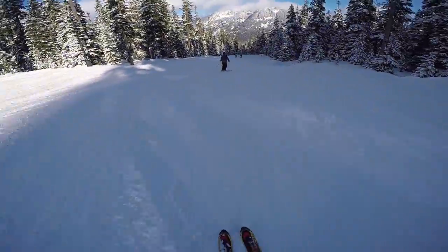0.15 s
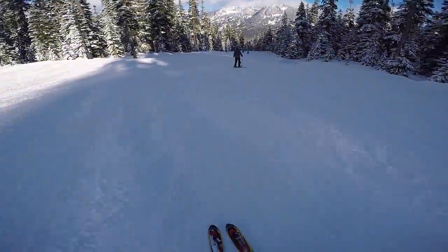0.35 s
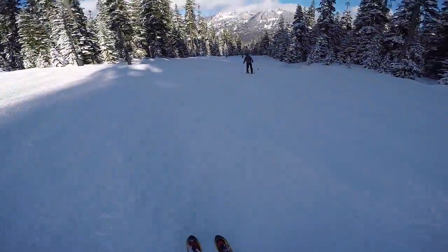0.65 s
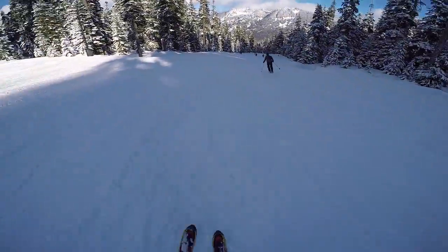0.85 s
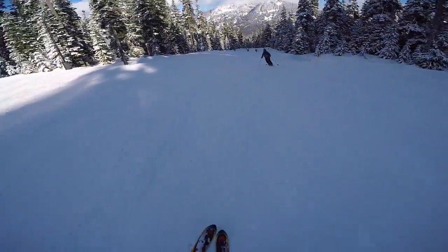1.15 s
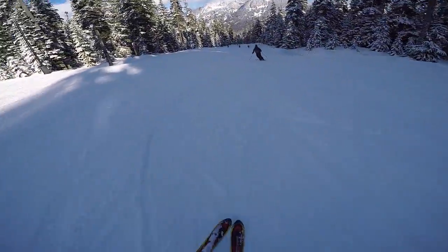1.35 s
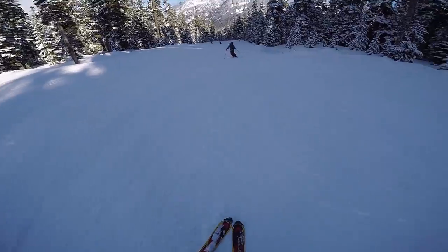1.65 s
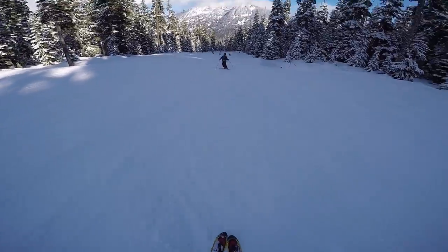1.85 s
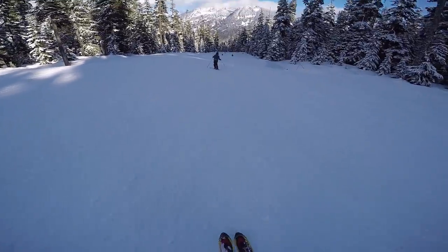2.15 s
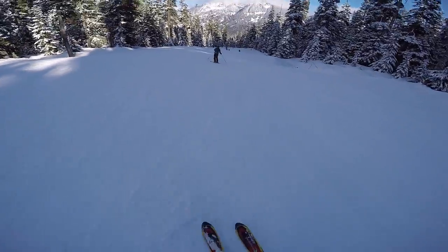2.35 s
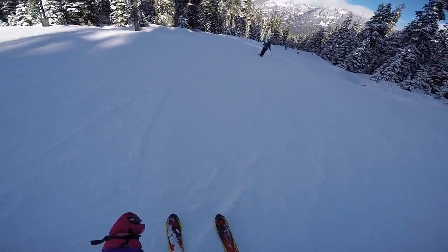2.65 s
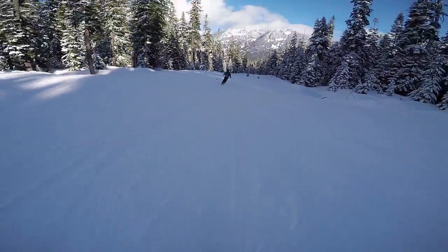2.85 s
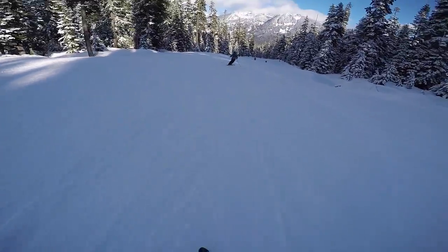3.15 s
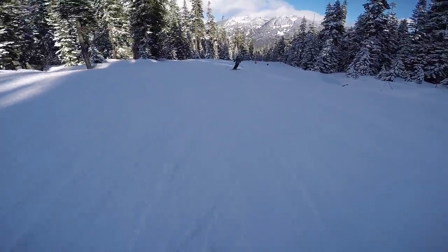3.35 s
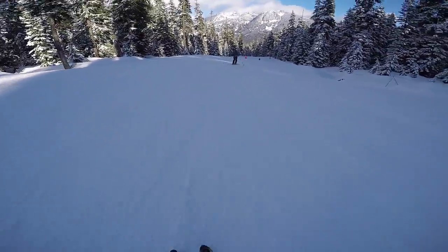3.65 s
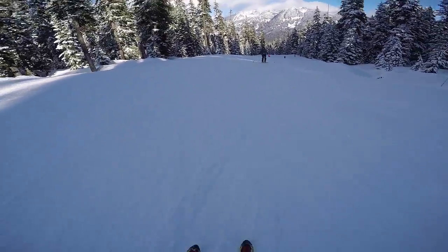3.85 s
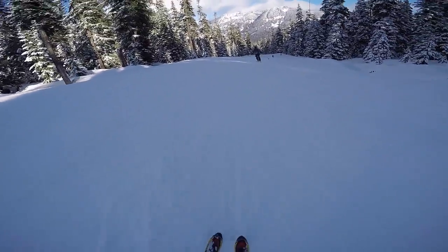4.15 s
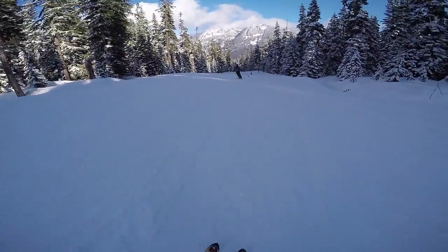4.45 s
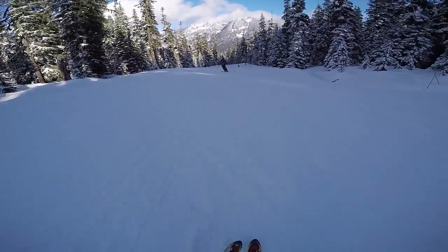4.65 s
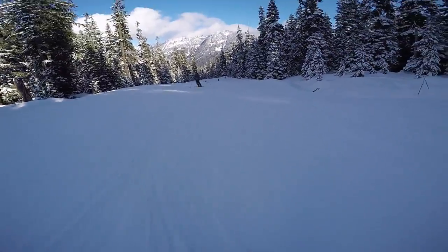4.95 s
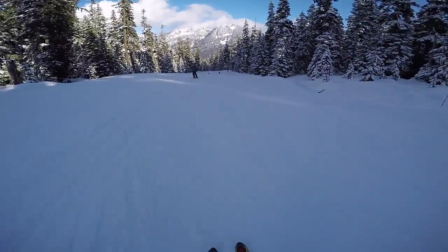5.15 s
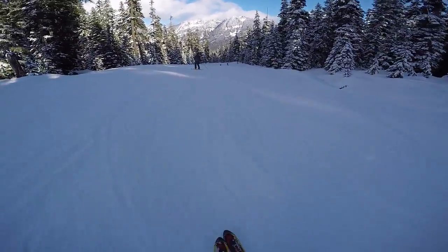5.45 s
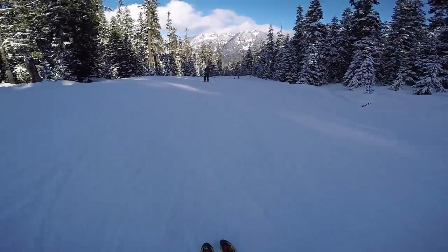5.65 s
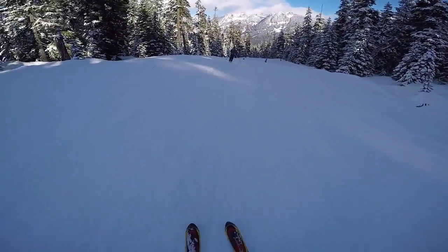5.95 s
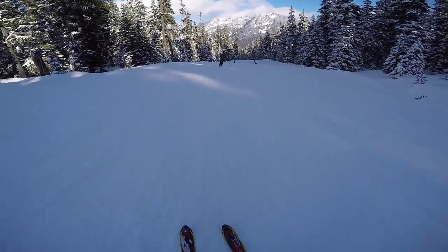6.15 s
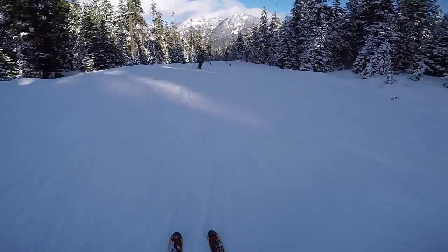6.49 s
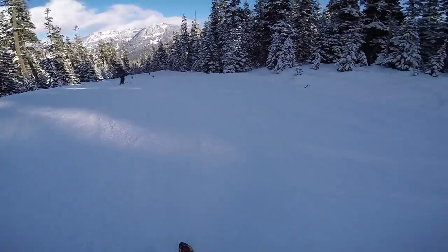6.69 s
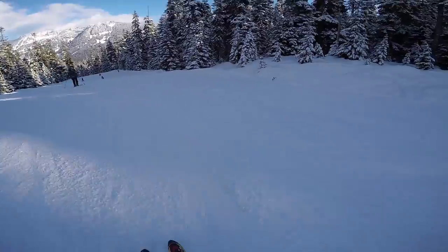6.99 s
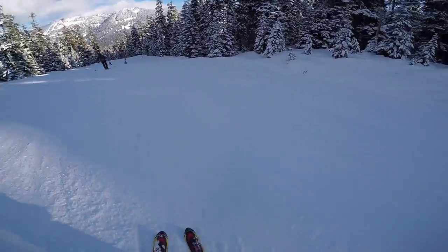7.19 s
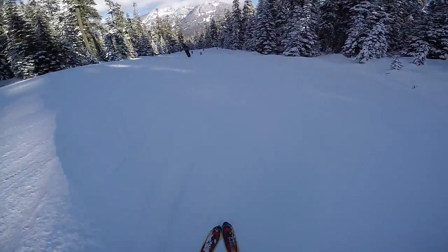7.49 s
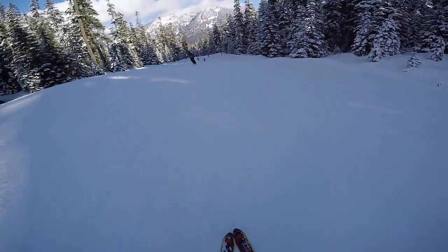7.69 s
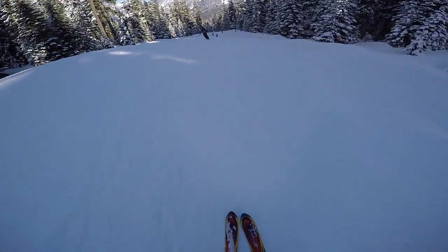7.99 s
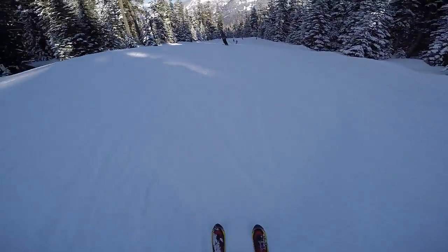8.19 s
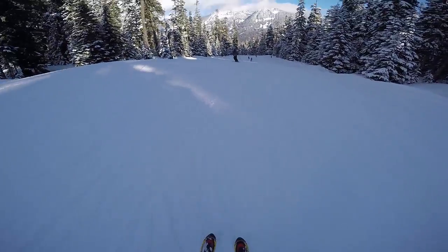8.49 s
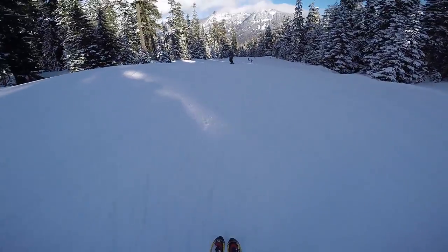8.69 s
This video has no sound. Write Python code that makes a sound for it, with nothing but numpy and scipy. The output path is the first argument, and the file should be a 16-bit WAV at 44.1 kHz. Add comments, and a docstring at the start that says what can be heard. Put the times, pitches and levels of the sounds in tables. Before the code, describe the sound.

Heard from a small camera on a moving skier: rough, grainy scrapes at about 0.4, 1.5, 2.5, 4.1, 6.2 and 7.9 seconds, with short hard knocks as edges catch. Between turns the bases hiss and scuff. Low wind thumps irregularly against the microphone over a thin, even air rush, and skis clack together at the end.

```python
"""Packed snow hisses and crunches under skis linking turns, heard from a small camera worn on the body.
Random clicks of breaking grains, filtered and resonated, swell in each skid and scuff; noise bursts and
decaying sines make knocks, bumps, clacks, clinks and a tick. Pressure swings and low filtered noise buffet
the microphone over an even rush of air. Resonances of the camera case colour snow, knocks and rush."""
import sys
import numpy as np
from scipy import signal
from scipy.fft import rfft, irfft
from scipy.io import wavfile
from scipy.ndimage import uniform_filter1d

SR = 44100
rng = np.random.default_rng(int(sys.argv[2]) if len(sys.argv) > 2 else 0)


def dump_mix(stems):
    """Bounce the given channels to the path in sys.argv[1] as a 16-bit WAV at rate SR."""
    frames = np.atleast_2d(stems).T  # one column per channel
    limited = np.clip(frames, -1, 1)  # hard clip at full scale
    pcm = np.round(limited * 32767).astype(np.int16)
    wavfile.write(sys.argv[1], SR, pcm)


N = 389403
T = np.arange(N) / SR
FREQS = np.fft.rfftfreq(N, 1 / SR)

# Spectrum of a skidding edge. Each row: frequency in Hz, relative gain in dB.
SKID_SPECTRUM = [(300, -22.5), (800, -15.5), (1150, -2), (1700, -2), (2200, -3), (2750, -1), (3300, -1),
                 (4400, -5), (5400, -6.5), (7500, -12), (10000, -17.5), (11500, -28), (15000, -34)]
# Spectrum of the flat base. Each row: frequency in Hz, relative gain in dB.
GLIDE_SPECTRUM = [(300, -35), (800, -7.5), (1100, 0), (1700, 3), (2300, 1.5), (3200, 0), (4000, -4),
                  (5100, -7), (6050, -4), (6700, -22), (7500, -11), (10000, -4), (11500, -32), (15000, -46)]
# Spectrum of the hollow ski body. Each row: frequency in Hz, relative gain in dB.
BODY_SPECTRUM = [(120, -16), (225, 1.5), (300, 0.5), (345, -7.5), (385, -14), (490, 3.5), (600, -5),
                 (740, -4.5), (850, -8.5), (1200, -38)]
# A treble band of the spray rises and dips. Each row: time in seconds, gain at the band centre in dB.
TREBLE_BAND = [(.5, 4), (.9, -3), (1.5, -5), (1.9, 2), (2.5, 7), (3.4, 1), (4.0, -1), (4.7, -7), (5.1, 5),
               (6.2, 2.5), (8.83, 1)]
TREBLE_BAND_HZ, TREBLE_BAND_WIDTH_HZ = 5330, 560
SPRAY_DB, SPRAY_AT_DB, SPRAY_GROWTH = -60.5, -51, 0.82  # spray at one friction level; dB per dB of friction
CARVE_STEADY = 0.25  # share of the chatter that a loaded edge takes away, 0-1
CRUNCH_DB = -6  # coarse ice crystals re fine grains
# centre wanders by the SWAY share
GRIND_HZ, GRIND_WIDTH_HZ, GRIND_SWAY = 1250, 400, 0.043
RASP_HZ, RASP_WIDTH_HZ, RASP_SWAY = 3660, 970, 0.052
SING_HZ, SING_WIDTH_HZ = 2720, 310  # a ski sings under edge friction


def skis():
    """Grains crushed under bases and edges, in uneven surges as the skis ride over ridges."""
    (friction_db, edge, hardness_db, hiss_hz, hiss_db, thrown_db,
     grind_db, rasp_db, sing_db, hollow) = contact()
    spray_db = SPRAY_DB + SPRAY_GROWTH * (friction_db - SPRAY_AT_DB) + thrown_db
    loose = 1 - CARVE_STEADY * edge ** 2
    chatter = undb(loose * (1.57 * walk(47) + 0.93 * walk(170)))

    fine = grains(per_s=7000, spread_db=2.5)
    coarse = grains(per_s=600, spread_db=2.5)
    skid = unit(colour(fine + undb(CRUNCH_DB) * coarse, SKID_SPECTRUM), "scrape")
    glide = unit(colour(grains(per_s=14000, spread_db=2.5), GLIDE_SPECTRUM), "scrape")
    crush = np.sin(edge * np.pi / 2) * skid + np.cos(edge * np.pi / 2) * glide
    crush = case(snow_echo(crush, lag_s=0.001085, sway=0.242, share=0.3))

    # soft snow grinds low, hard snow rasps higher, fine thrown snow hisses on top
    scrape = below(crush, hz=3700)
    grind = below(scrape, hz=1950)
    rasp = scrape - grind
    spray = crush - scrape
    grind = moving_peak(grind, GRIND_HZ * (1 + GRIND_SWAY * walk(8.6)), GRIND_WIDTH_HZ, grind_db)
    rasp = moving_peak(rasp, SING_HZ, SING_WIDTH_HZ, sing_db)
    rasp = moving_peak(rasp, RASP_HZ * (1 + RASP_SWAY * walk(5.5)), RASP_WIDTH_HZ, rasp_db)
    grind *= undb(-.35 * hardness_db + 1.0 * walk(27))
    scrape = grind + rasp * undb(1.03 * walk(45))

    # airborne spray follows the chatter loosely; a flat base hisses more narrowly
    spray = moving_peak(spray, hiss_hz, width_hz=750 + 700 * edge, db=hiss_db)
    spray = spray * chatter ** 0.7 * undb(1.4 * walk(34))
    spray = moving_peak(spray, TREBLE_BAND_HZ, TREBLE_BAND_WIDTH_HZ, curves(TREBLE_BAND)[0])
    spray = edge * spray + (1 - edge) * below(spray, hz=7600)

    body = colour(grains(per_s=5000, spread_db=3.5) * chatter, BODY_SPECTRUM)
    scrape_out = undb(friction_db + 0.5) * unit(scrape * chatter, "scrape")
    spray_out = np.hypot(undb(spray_db), powder()) * unit(spray, "spray")
    return scrape_out + spray_out + hollow * unit(body, "body")


# Running straight on the bases. Each row: time in seconds, relative friction level in dB.
SLIDE = [(0, -61), (.25, -56.5), (.9, -60), (1.3, -56.5), (1.98, -63), (2.4, -55), (3.35, -62), (4.3, -58),
         (4.97, -63.5), (5.6, -58.5), (6.5, -65), (7.3, -63.5), (7.75, -62.5), (8.2, -63), (8.45, -63.5),
         (8.83, -64.5)]
# Flat bases scuff over a swell in the snow. Each row: crest in seconds, length at half power in seconds,
# relative friction level in dB, hollow ski body re that level in dB.
SCUFFS = [(1.082, 0.085, -54.5, -20), (2.262, 0.056, -55, -13), (2.54, 0.067, -53.5, -6.5),
          (2.606, 0.024, -54, -7), (2.812, 0.18, -52, -28), (2.891, 0.1, -48, -13), (3.017, 0.18, -55, -14),
          (3.209, 0.051, -49.5, -12), (3.46, 0.03, -53, -16), (3.57, 0.039, -53, -12.5),
          (3.72, 0.11, -52.5, -20), (3.87, 0.056, -46, -16), (3.976, 0.077, -49, -25),
          (4.42, 0.096, -53.5, -28), (4.592, 0.13, -54, -31), (4.697, 0.057, -52.5, -14),
          (4.809, 0.054, -54.5, -22), (5.118, 0.067, -50.5, -8.5), (5.275, 0.14, -58.5, -12.5),
          (5.51, 0.092, -54.5, -16), (5.69, 0.11, -57, -16), (5.834, 0.085, -55, -26),
          (6.754, 0.12, -61, -17), (7.482, 0.056, -57.5, -29), (8.722, 0.048, -58.5, -20)]
# Edges skid through a turn. Each row: bite in seconds, time held in seconds, relative friction level in dB,
# edge-setting time constant in seconds, snow hardness in dB (each takes 0.35 dB off the grind),
# hiss centre in Hz, hiss peak in dB, extra spray in dB, grind peak in dB, rasp peak in dB, singing peak in dB.
SKIDS = [(.365, 0.027, -44, 0.037, -2, 5060, 4.5, -0.5, 7, 1, 7),
         (.472, 0.071, -42.5, 0.044, 2, 5300, 2.5, -1, -2, 0.5, 0),
         (1.455, 0.05, -44.5, 0.06, 3, 6600, 4, 3.5, 5, 5, -2),
         (1.55, 0.13, -44, 0.047, 11, 5500, -4, -.5, 0.5, 3, -2),
         (1.74, 0.037, -49, 0.05, 6, 5500, -3, -3.5, 2.5, 4, -1),
         (2.49, 0.092, -44, 0.066, 5, 6050, 1, -2, -1, -5, -0.5),
         (4.072, 0.036, -40.5, 0.028, -6, 6670, 5, -1, -5, 1, 2.5),
         (4.7, 0.028, -53, 0.16, 16, 7000, 3, 2, -13, 3, -3),
         (6.198, 0.085, -47.5, 0.024, -2, 7200, 6.5, 0.5, 0, 0, 5),
         (7.89, 0.23, -46, .11, 8.5, 5970, 1.5, -1.5, 1, -1.5, 2.5),
         (8.17, 0.2, -55.5, 0.042, 5, 5970, -1, -3, 5, -2, 6)]
# between turns
SLIDE_EDGE, SCUFF_EDGE = 0.64, 0.096  # share of edge against flat base, 0-1
SLIDE_HARDNESS_DB, SCUFF_HARDNESS_DB = -5.5, 1
SLIDE_HISS_HZ, SCUFF_HISS_HZ = 7100, 6600
SLIDE_HISS_DB, SCUFF_HISS_DB = 1.5, 11
SLIDE_GRIND_DB, SCUFF_GRIND_DB = 0.5, 2.5
SLIDE_SING_DB, SCUFF_SING_DB = 2.5, 1
SLIDE_BODY_DB, SKID_BODY_DB = -15.5, -29  # hollow ski body re friction


def contact():
    """Powers of sliding, skids and scuffs add up to the friction; their shares set the snow colour."""
    slide = undb(curves(SLIDE)[0]) ** 2
    scuff = swells([row[:3] for row in SCUFFS])
    turns = [(skid_power(s, held_s, db, setting_s), 1, *snow) for s, held_s, db, setting_s, *snow in SKIDS]
    skid = sum(turn[0] for turn in turns)
    # power, edge, hardness, hiss Hz, hiss dB, extra spray, grind, rasp, singing
    parts = turns + [
        (slide, SLIDE_EDGE, SLIDE_HARDNESS_DB, SLIDE_HISS_HZ, SLIDE_HISS_DB, 0, SLIDE_GRIND_DB, 0, SLIDE_SING_DB),
        (scuff, SCUFF_EDGE, SCUFF_HARDNESS_DB, SCUFF_HISS_HZ, SCUFF_HISS_DB, 0, SCUFF_GRIND_DB, 0, SCUFF_SING_DB)]
    total = slide + skid + scuff
    powers = np.array([part[0] for part in parts])
    traits = np.array([part[1:] for part in parts])
    edge, *snow = traits.T @ powers / total
    hollow = slide * undb(SLIDE_BODY_DB) ** 2 + skid * undb(SKID_BODY_DB) ** 2
    hollow += swells([(s, length_s, db + hollow_db) for s, length_s, db, hollow_db in SCUFFS])
    return 10 * np.log10(total), np.clip(edge, 0, 1), *snow, np.sqrt(hollow)


SKID_SAG_DB_PER_S, SKID_RELEASE_S = 34.5, 0.047


def skid_power(s, held_s, db, setting_s):
    """One skid: the edge is set, holds while it scrubs off speed, and is released."""
    outside = np.maximum(s - T, 0) / setting_s + np.maximum(T - s - held_s, 0) / SKID_RELEASE_S
    sagging_db = db - SKID_SAG_DB_PER_S * np.clip(T - s, 0, held_s)
    return (undb(sagging_db) * np.exp(-outside)) ** 2


POWDER_DB, POWDER_FALL_S = -18, 0.17  # level re skid; decay time constant


def powder():
    """Powder thrown up by each skid keeps hissing as it falls: skid power through a one-pole decay."""
    thrown = sum(skid_power(s, held_s, db, setting_s) for s, held_s, db, setting_s, *_ in SKIDS)
    step = 1 / (POWDER_FALL_S * SR)
    return undb(POWDER_DB) * np.sqrt(signal.lfilter([step], [1, step - 1], thrown))


def snow_echo(x, lag_s, sway, share):
    """The snow reflects the sound a moment later; the lag shifts as the legs move."""
    return x + share * np.interp(T - lag_s * (1 + sway * walk(1.72)), T, x)


# Loose snow swishes out. Each row: crest in seconds, length at half power in seconds, level in dB.
SWISHES = [(2.86, 0.064, -57.5), (3.21, 0.044, -67), (3.86, 0.077, -62), (5.11, 0.043, -61.5),
           (5.5, 0.093, -71), (7.48, 0.089, -68)]
SWISH_HZ, SWISH_WIDTH_HZ = 6050, 700


def swishes():
    """Loose snow squeezed out from under the bases: grains through a narrow, high band."""
    band = np.exp(-np.log(2) * (2 * (FREQS - SWISH_HZ) / SWISH_WIDTH_HZ) ** 2 / 2)
    snow = irfft(rfft(grains(per_s=6100, spread_db=8.5)) * band, N)
    return np.sqrt(swells(SWISHES)) * unit(snow, "spray")


# A ski slaps or its edge catches. Each row: start in seconds, relative level in dB,
# time to fall 60 dB in seconds, treble re bass in dB.
KNOCKS = [(0.02, -34, 0.043, -2), (0.1996, -31, 0.057, 5), (0.348, -23.5, 0.11, -4),
          (0.3677, -21.5, 0.1, 2), (.387, -19, .06, -8), (.472, -30, .04, -3), (0.639, -30.5, 0.19, 5),
          (0.784, -33.5, 0.049, 7), (1.284, -27, .02, 2), (1.2893, -25, 0.022, 4), (1.443, -23, 0.092, 11),
          (1.46, -17.5, 0.028, 0), (1.538, -34, 0.087, 7), (1.584, -24, 0.073, 2), (1.623, -39, 0.036, 3),
          (1.673, -34, 0.025, 10), (1.748, -29, 0.043, 5), (1.8, -31, .04, 3), (1.9053, -25, 0.023, -3),
          (2.15, -33, 0.025, 13), (2.4886, -28, 0.042, 1), (2.617, -27, 0.028, -1), (2.642, -24, 0.021, 0),
          (3.4975, -31, 0.027, 7), (3.71, -32, 0.022, 1), (3.812, -29.5, 0.039, -9), (3.934, -27, 0.03, 7),
          (3.9469, -26.5, 0.048, 10), (4.0002, -19.5, 0.02, -7), (4.055, -27, 0.018, 13),
          (4.066, -18, 0.033, 0), (4.087, -23, 0.046, -6), (4.104, -22, .04, -3), (4.136, -23.5, 0.031, -9),
          (4.557, -29, 0.022, 8), (4.6347, -32, 0.023, 0), (4.689, -18.5, .07, 2), (4.698, -19.5, .03, 6),
          (4.704, -28, 0.022, 6), (4.725, -21.5, 0.044, -3), (4.731, -28, 0.027, 3), (5.09, -29, 0.1, -10),
          (5.329, -35, .05, -4), (5.452, -33, .05, 2), (5.854, -33, 0.065, 2), (6.106, -28, 0.028, 2),
          (6.1427, -24, 0.14, 5), (6.217, -23.5, .03, 10), (6.243, -21.5, 0.012, 2),
          (6.297, -25.5, 0.072, 4), (6.645, -29.5, 0.055, 3), (7.722, -32, 0.017, 12), (7.887, -28, .05, 7)]
# Spectrum of a slapping ski. Each row: frequency in Hz, relative gain in dB.
SLAP_SPECTRUM = [(300, -19), (800, -11), (1200, 1), (1850, 0.5), (2300, -1.5), (3200, 1), (4000, -9.5),
                 (5400, -13), (7500, -12), (10000, -25), (15000, -40)]


def knocks():
    """An edge bites a ridge: a sudden burst of crushed snow, brighter on ice; the ski rings a little."""
    dull, crisp, boards = np.zeros((3, N))
    for s, db, t60_s, treble_db in KNOCKS:
        blow = burst(t60_s)
        add(dull, s, blow, db - treble_db / 2)
        add(crisp, s, blow, db + treble_db / 2)
        add(boards, s, ski_ring(scatter_db=1.0), db)
    snow = crisp + below(dull - crisp, hz=2500)  # dull bass, crisp treble
    return undb(-6.0) * case(colour(snow, SLAP_SPECTRUM)) + undb(-21.0) * boards


# Skis clap together and rebound. Each row: start in seconds, ring peak in dB, relative crack level in dB.
CLACKS = [(8.795, -31, -30.5), (8.7981, -30.5, -32)]
# Spectrum of the crack. Each row: frequency in Hz, relative gain in dB.
CRACK_SPECTRUM = [(400, -32), (1200, -12), (1900, 9.5), (3600, 9), (4300, -4), (5000, -19), (6200, -6),
                  (7500, -11), (8500, -25), (15000, -36)]


def clacks():
    """Ski against ski: a hard crack, then the boards ring briefly."""
    ring, crack = np.zeros((2, N))
    for s, ring_db, crack_db in CLACKS:
        add(ring, s, ski_ring(scatter_db=1), ring_db)
        add(crack, s, burst(t60_s=0.013), crack_db)
    return ring + colour(crack, CRACK_SPECTRUM)


# Modes of a ski. Each row: frequency in Hz, relative level in dB, time to fall 60 dB in seconds.
SKI_MODES = [(950, -13, 0.11), (1440, -6, 0.17), (1650, -26, 0.027), (2090, -11, 0.06), (2360, -3, 0.023),
             (2650, 9, .055), (3270, 4, 0.015), (3470, -6, 0.018), (4030, -1, 0.019), (6300, -3, .014),
             (7230, -2.5, 0.013)]


def ski_ring(scatter_db):
    """Ski modes start together; the place of the blow, drawn at random, sets how strongly each answers."""
    t = T[:SR // 8]
    ring = np.zeros(len(t))
    for hz, db, t60_s in SKI_MODES:
        gain = undb(db + scatter_db * rng.standard_normal())
        ring += gain * np.sin(2 * np.pi * hz * t) * np.exp(-np.log(1000) * t / t60_s)
    return ring


GRIT_DB, GRIT_S = 9.5, 0.00205  # uneven bites of crushed snow: +- spread, spacing


def burst(t60_s):
    """A gritty contact: clipped noise in uneven bites that starts quickly and dies away."""
    t = T[:SR // 8]
    moments = np.arange(0, t[-1], GRIT_S)
    grit = undb(GRIT_DB * np.interp(t, moments, rng.uniform(-1, 1, len(moments))))
    decay = np.exp(-np.log(1000) * t / max(t60_s, .005))
    return np.tanh(2 * rng.standard_normal(len(t))) * grit * (1 - np.exp(-t / .0006)) * decay


# A soft, dull bump of ski or boot. Each row: start in seconds, relative level in dB.
BUMPS = [(1.5, -37), (2.521, -43), (2.75, -38), (3.876, -38), (4.005, -30), (7.027, -44), (8.503, -40),
         (8.518, -41), (8.536, -42), (8.542, -41), (8.801, -32.5)]
# Spectrum of a bump. Each row: frequency in Hz, relative gain in dB.
BUMP_SPECTRUM = [(150, -30), (500, -5), (900, -1), (1300, 5), (1700, -11), (3000, -19), (8000, -41)]


def bumps():
    """Softer contacts of ski or boot: short bursts filtered dull."""
    out = np.zeros(N)
    for s, db in BUMPS:
        add(out, s, burst(t60_s=0.02), db)
    return undb(4.0) * colour(out, BUMP_SPECTRUM)


# A small metal part clinks. Each row: start in seconds, pitch in Hz, peak in dB.
CLINKS = [(1.2894, 2750, -36.5), (4.0655, 2660, -23.5), (4.0655, 6780, -35.5), (4.636, 2720, -39),
          (8.756, 5150, -47), (8.755, 2870, -42)]


def clinks():
    """A brief, thin metallic ring: one decaying sine."""
    out, t = np.zeros(N), T[:SR // 10]
    for s, hz, db in CLINKS:
        add(out, s, np.sin(2 * np.pi * hz * t) * np.exp(-t / 0.0039), db)
    return out


# A sharp tick, likely a crumb of ice on the case. Each row: start in seconds, relative level in dB.
TICKS = [(5.925, -31.5)]
# Spectrum of the tick. Each row: frequency in Hz, relative gain in dB.
TICK_SPECTRUM = [(300, -25), (1000, -23), (1500, -5), (2100, 1), (2800, 6), (4500, -4), (7000, -17),
                 (9300, -2), (11000, -13), (13000, -7), (16000, -18)]
TICK_RING_HZ, TICK_RING_S, TICK_RING_DB = 1430, 0.0045, -45  # case ring: pitch, decay time constant, peak


def ticks():
    """A crumb of ice taps the case, which rings for an instant."""
    tap, ring = np.zeros((2, N))
    t = T[:SR // 50]
    for s, db in TICKS:
        add(tap, s, np.tanh(2 * rng.standard_normal(len(t))) * np.exp(-t / 0.0007), db)
        add(ring, s, np.sin(2 * np.pi * TICK_RING_HZ * t) * np.exp(-t / TICK_RING_S), TICK_RING_DB)
    return undb(6.5) * colour(tap, TICK_SPECTRUM) + ring


# Airstream on the microphone. Each row: time in seconds, then relative levels in dB of
# the buffeting, the thrum of middling eddies, the small eddies.
AIRSTREAM = [(0, -37.5, -48, -50), (.2, -37.5, -47.5, -67.5), (.5, -33.5, -40, -60.5),
             (.87, -35.5, -52, -60.5), (1.25, -34.5, -70, -66), (1.45, -38, -44, -61.5),
             (1.62, -29, -44, -65.5), (1.9, -31.5, -41.5, -63.5), (2.45, -31.5, -54, -68),
             (2.7, -30.5, -50, -66), (2.9, -41.5, -44.5, -66.5), (3.15, -37, -50, -62),
             (3.4, -41, -65, -70), (3.55, -33.5, -47, -61), (4.3, -39.5, -49, -68),
             (5.5, -30.5, -50.5, -66), (6.0, -36, -58, -68.5), (6.5, -39, -45.5, -65.5),
             (7.4, -33, -46.5, -65.5), (7.97, -29, -40, -67), (8.2, -50, -59.5, -72), (8.44, -41, -56, -70),
             (8.62, -34.5, -50, -70), (8.83, -34, -41, -58)]
# A brief flutter of small eddies. Each row: crest in seconds, length at half power in seconds,
# relative level in dB.
FLUTTERS = [(.84, 0.069, -65), (1.11, 0.088, -57), (2.58, 0.025, -54), (2.755, 0.026, -53),
            (3.81, 0.082, -57.5), (4.38, .03, -68), (4.56, 0.026, -57), (5.03, 0.032, -59),
            (5.73, 0.04, -60), (6.29, 0.033, -63), (6.87, 0.024, -67), (7.035, 0.016, -54),
            (8.55, 0.04, -57)]
# Spectrum of the buffeting. Each row: frequency in Hz, relative gain in dB.
BUFFET_SPECTRUM = [(10, -4.5), (22, 4), (38, -2.5), (48, -1), (55, -11), (64, -17), (80, -59), (140, -72)]
# Spectrum of the thrum. Each row: frequency in Hz, relative gain in dB.
THRUM_SPECTRUM = [(40, -25.5), (55, 1), (62, -3.5), (71, -14), (82, -10), (100, -10), (140, -41),
                  (300, -70)]
# Spectrum of the small eddies. Each row: frequency in Hz, relative gain in dB.
EDDY_SPECTRUM = [(50, 6), (100, 9), (118, -0.5), (132, 8), (148, 0), (190, -4.5), (230, -5), (290, -9),
                 (370, -16.5), (490, -16), (650, -19), (1000, -15.5), (3000, -37)]


def wind():
    """Large eddies thump on the microphone; smaller ones thrum and flutter above them."""
    buffet_db, thrum_db, eddy_db = curves(AIRSTREAM)
    buffet = undb(buffet_db + 3.4 * walk(6.5)) * unit(swirl(BUFFET_SPECTRUM), "wind")
    gust_thrum = swells([(s, length_s, db) for s, length_s, _, db in GUSTS])
    thrum_level = np.sqrt(undb(thrum_db + 0.91 * walk(8.8)) ** 2 + gust_thrum)
    thrum = thrum_level * unit(swirl(THRUM_SPECTRUM), "thrum")
    rumble = undb(-2.0) * buffet + undb(-2.9) * gusts() + undb(-0.84) * thrum
    ease = np.sin(np.pi / 2 * np.minimum(1, np.minimum(T, T[::-1]) / .03)) ** 2  # 30 ms fades at both ends
    rumble = colour(ease * rumble, [(65, -0.5), (90, -18.0), (150, -12), (400, -35)])

    eddies = even(colour(rng.standard_normal(N), EDDY_SPECTRUM), window_s=0.082)
    eddies = unit(eddies * undb(1.8 * walk(30)), "eddy")
    return rumble + undb(-2.5) * np.sqrt(undb(eddy_db) ** 2 + swells(FLUTTERS)) * eddies


# An eddy thumps on the microphone. Each row: centre in seconds, length at half power in seconds,
# relative buffeting level in dB, relative thrum level in dB.
GUSTS = [(0.101, 0.061, -25.5, -41), (0.303, 0.03, -22, -51), (0.395, 0.032, -29.5, -52),
         (0.617, 0.036, -28, -43), (1.007, 0.042, -28.5, -37.5), (1.079, 0.035, -31.5, -36),
         (1.393, 0.032, -26.5, -52), (1.642, 0.033, -31, -46), (1.75, 0.032, -38, -48),
         (1.81, 0.036, -25.5, -49), (2.088, 0.057, -35, -40), (2.194, 0.03, -22.5, -47),
         (2.296, 0.031, -25.5, -40), (2.385, 0.035, -22, -36), (2.596, 0.022, -22, -33),
         (2.767, 0.023, -29, -42), (3.504, 0.026, -27, -43), (3.835, 0.029, -26.5, -35.5),
         (3.927, 0.041, -21.5, -33.5), (4.204, 0.054, -27, -36.5), (4.379, 0.025, -32.5, -49),
         (4.431, .027, -34, -36), (4.583, 0.038, -53, -39), (4.679, 0.034, -24, -48),
         (4.818, .03, -28.5, -45), (5.002, 0.023, -23.5, -35), (5.06, 0.025, -26, -50),
         (5.289, 0.047, -33, -34.5), (5.61, 0.064, -33, -44), (5.748, 0.044, -20, -30),
         (6.155, 0.039, -21, -55), (6.691, 0.03, -25.5, -46), (6.755, 0.035, -20.5, -38),
         (6.832, 0.027, -27, -51), (7.05, 0.03, -29, -34), (7.219, 0.03, -23, -44),
         (7.295, 0.035, -23.5, -39), (7.538, 0.044, -26, -35.5), (7.676, 0.051, -25, -51),
         (7.826, 0.04, -20.5, -39), (7.951, 0.033, -23.5, -42)]
GUST_CYCLES = 1.204  # pressure swings within a gust's length: larger eddies sound lower


def gusts():
    """Each passing eddy sucks at the microphone, and the pressure swings back."""
    out = np.zeros(N)
    for s, length_s, db, _ in GUSTS:
        near = slice(*np.searchsorted(T, [s - 3 * length_s, s + 3 * length_s]))
        u = (T[near] - s) / length_s
        bell = np.exp(-2 * np.log(2) * u ** 2)
        out[near] -= np.sqrt(2) * undb(db) * bell * np.cos(2 * np.pi * GUST_CYCLES * u)
    return out


def swirl(points):
    """Low turbulence of even strength, so that the gusts decide how it swells."""
    steady = even(colour(rng.standard_normal(N), points), window_s=0.087)
    return colour(steady, [(70, 11.0), (100, 4.0), (200, -33)])


# Spectrum of the even rush of air. Each row: frequency in Hz, relative gain in dB.
AIR_SPECTRUM = [(20, 20), (55, 25.5), (90, 1), (170, -2), (370, -2), (500, -3.5), (820, -5.5), (1200, -10),
                (2200, -6), (3000, -3), (5000, -10.5), (7000, -8), (11000, -15), (15000, -23)]
AIR_DB, AIR_AT_DB, AIR_FOLLOWS = -64.5, -64, 0.31  # rush at one sliding level; dB per dB of sliding


def air():
    """The even rush of air and sliding snow, a little stronger where the sliding friction is."""
    rush = case(colour(grains(per_s=20000, spread_db=2.0) * undb(1.17 * walk(36)), AIR_SPECTRUM))
    rush_db = AIR_DB + AIR_FOLLOWS * (curves(SLIDE)[0] - AIR_AT_DB)
    return undb(rush_db) * unit(rush, "wide")


# Resonances and notches of the camera case. Each row: centre in Hz, width in Hz, gain in dB.
CASE_MODES = [(867, 63, -9), (1347, 84, 2.5), (1490, 150, -3), (1854, 150, 3.5), (2220, 380, -3),
              (2601, 130, 6), (2840, 130, 5.5), (3150, 150, 2.5), (3797, 220, -4), (4440, 340, 2),
              (5340, 270, -7.5), (5980, 150, 1.5), (6760, 240, 5), (7300, 200, -1.5), (7630, 300, 0.5),
              (8450, 260, -4), (10050, 470, 1.5), (13500, 1600, 6)]


def case(x):
    """Ring the camera case; minimum phase, so the ring follows each blow."""
    db = sum(boost_db * np.exp(-np.log(2) * (2 * (FREQS - hz) / width_hz) ** 2)
             for hz, width_hz, boost_db in CASE_MODES)
    cepstrum = irfft(np.log(undb(db)), N)
    cepstrum[1:] *= 2 * (np.arange(1, N) < N / 2)  # fold to minimum phase
    return irfft(rfft(x) * np.exp(rfft(cepstrum)), N)


def grains(per_s, spread_db):
    """Snow grains breaking: clicks at random moments, most small and a few large."""
    hit = rng.random(N) < per_s / SR
    size = undb(spread_db * np.minimum(rng.exponential(size=N), 6))
    x = hit * size * rng.choice([-1, 1], N)
    return x / x.std()


def moving_peak(x, hz, width_hz, db):
    """A resonance whose centre, width and height may move over time."""
    f, t, z = signal.stft(x, SR, nperseg=1024)
    centre, width, height = (np.interp(t, T, np.broadcast_to(v, N)) for v in (hz, width_hz, db))
    gain = undb(height * np.exp(-np.log(2) * (2 * (f[:, None] - centre) / width) ** 2))
    return signal.istft(z * gain, SR)[1][:N]


def swells(table):
    """Power of bell-shaped swells, each given by its crest, its length at half power and its level."""
    power = np.zeros(N)
    for s, length_s, db in table:
        near = slice(*np.searchsorted(T, [s - 2 * length_s, s + 2 * length_s]))
        power[near] += undb(db) ** 2 * np.exp(-np.log(2) * (2 * (T[near] - s) / length_s) ** 2)
    return power


def walk(rate):
    """Smooth chance with spread 1 that changes about rate times a second."""
    x = irfft(rfft(rng.standard_normal(N)) * np.exp(-(FREQS / rate) ** 2), N)
    return x / x.std()


def even(x, window_s):
    """Hold the strength of a noise steady over a short window."""
    return x / np.sqrt(uniform_filter1d(x ** 2, int(window_s * SR)) + 1e-12)


def unit(x, band):
    """Scale to rms 1 within a named band."""
    bands_hz = {"wind": (20, 80), "thrum": (56, 110), "eddy": (110, 330), "body": (400, 850),
                "scrape": (1000, 4200), "spray": (4800, 11000), "wide": (1000, 11000)}
    lo, hi = bands_hz[band]
    inside = rfft(x)[(FREQS > lo) & (FREQS < hi)]
    return x * N / np.sqrt(2 * np.sum(np.abs(inside) ** 2))


def colour(x, points):
    """Filter by a spectrum of (Hz, dB) points, joined on a log frequency axis."""
    hz, db = np.transpose(points)
    return irfft(rfft(x) * undb(np.interp(np.log(FREQS + 1), np.log(hz), db)), N)


def below(x, hz):
    """The part of a sound under a frequency."""
    return irfft(rfft(x) / (1 + (FREQS / hz) ** 8), N)


def add(out, s, sound, db):
    """Mix in a short sound at time s with its peak at db."""
    i = int(s * SR)
    part = sound[:max(N - i, 0)]
    out[i:i + len(part)] += part * undb(db) / np.abs(sound).max()


def curves(table):
    """Each column of a table as a value for every sample."""
    s, *columns = np.transpose(table)
    return [np.interp(T, s, c) for c in columns]


def undb(db):
    """Decibels to gain."""
    return 10 ** (np.asarray(db) / 20)


def scene():
    """Everything at the one microphone."""
    snow = skis() + swishes()
    contacts = knocks() + clacks() + bumps() + clinks() + ticks()
    return (snow + contacts + wind() + air())[None]


TOP_HZ = 15300


def record(dry):
    """The camera cuts the top: a steep elliptic low-pass."""
    return signal.sosfilt(signal.ellip(10, .2, 70, TOP_HZ, fs=SR, output="sos"), dry)


dry = scene()
out = record(dry)
dump_mix(out)
```